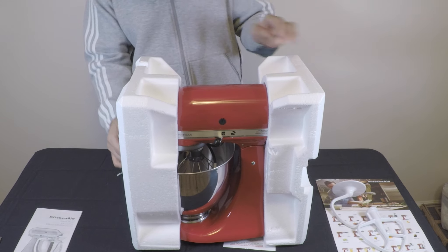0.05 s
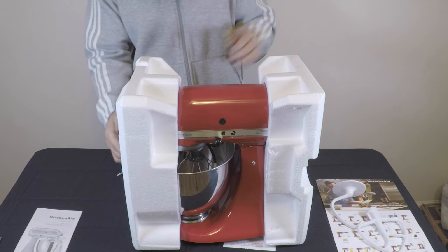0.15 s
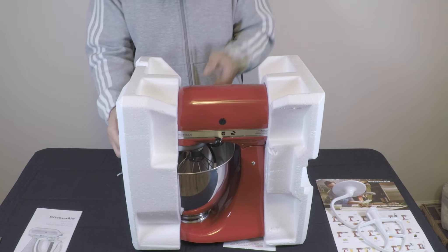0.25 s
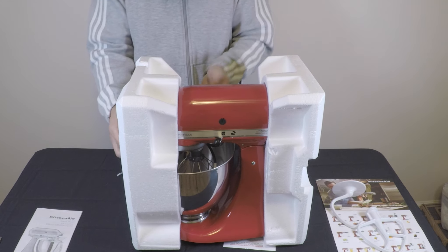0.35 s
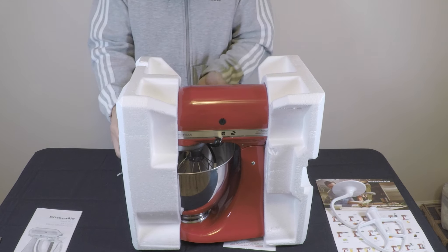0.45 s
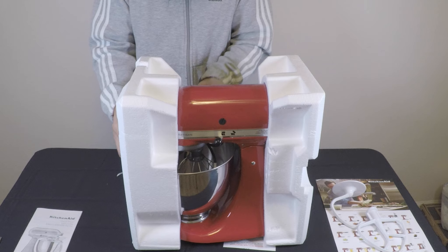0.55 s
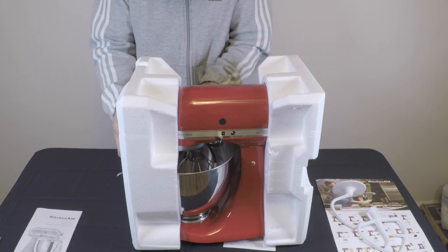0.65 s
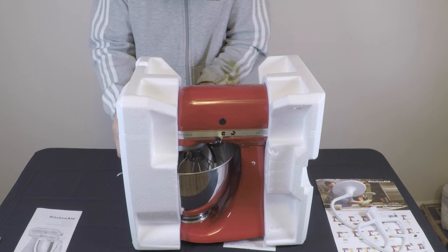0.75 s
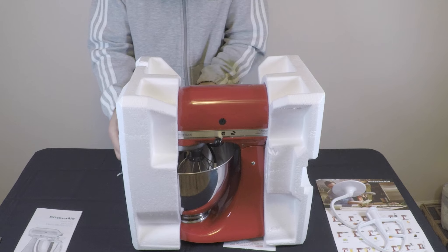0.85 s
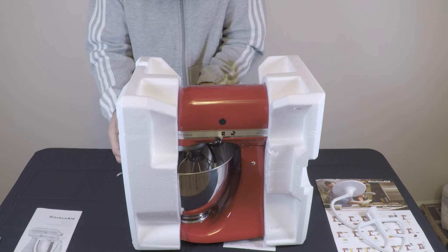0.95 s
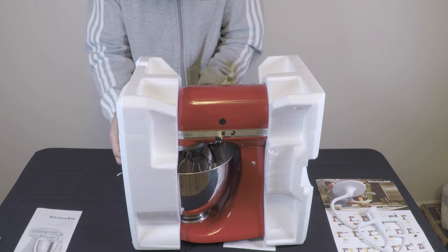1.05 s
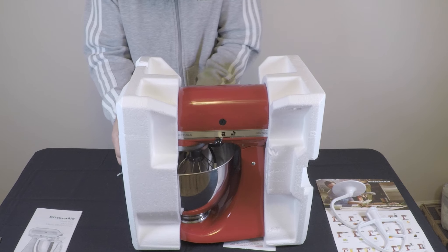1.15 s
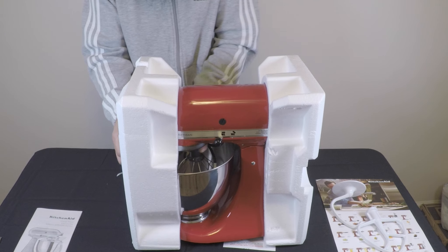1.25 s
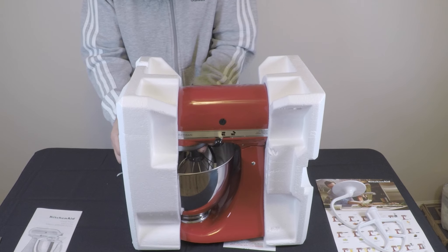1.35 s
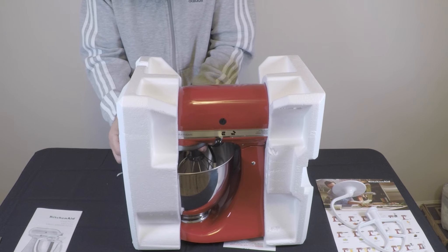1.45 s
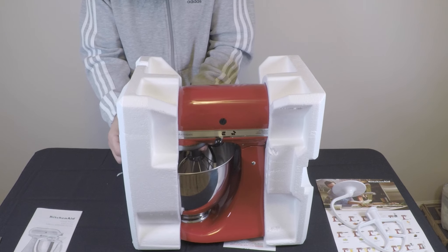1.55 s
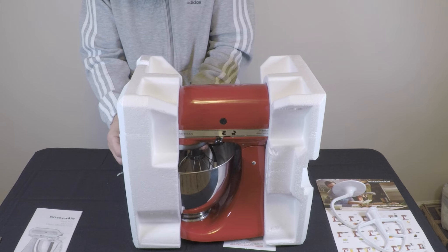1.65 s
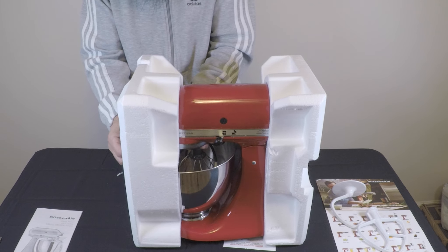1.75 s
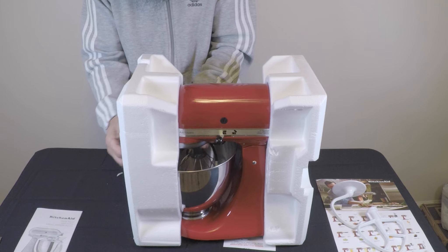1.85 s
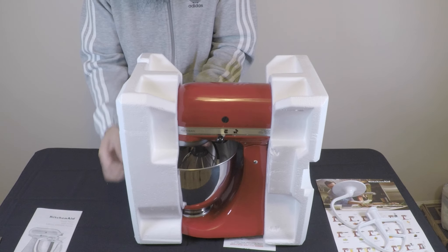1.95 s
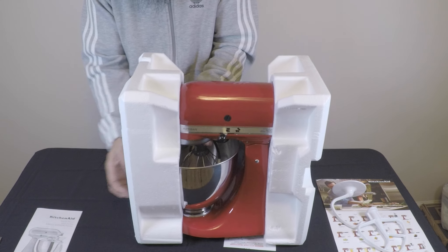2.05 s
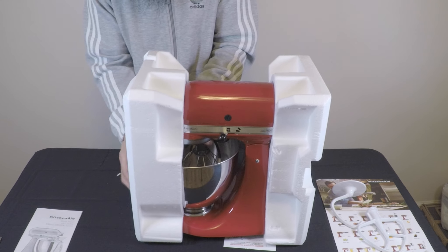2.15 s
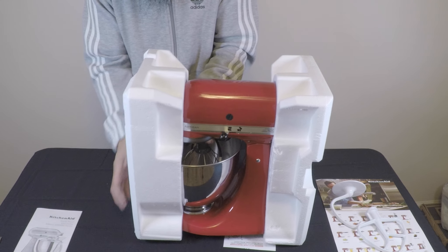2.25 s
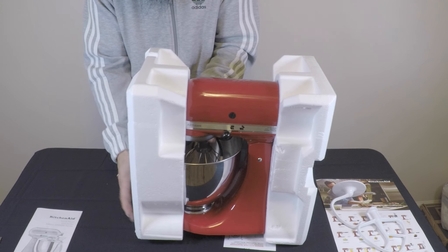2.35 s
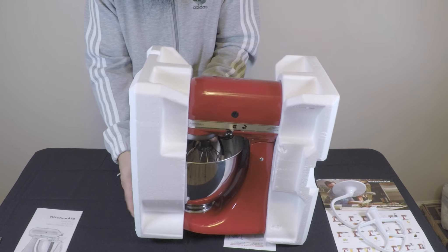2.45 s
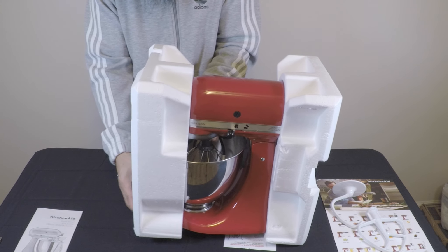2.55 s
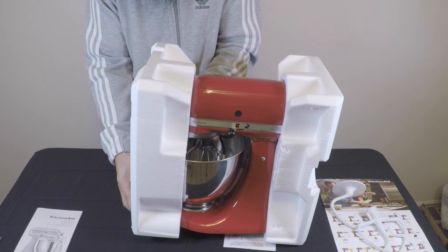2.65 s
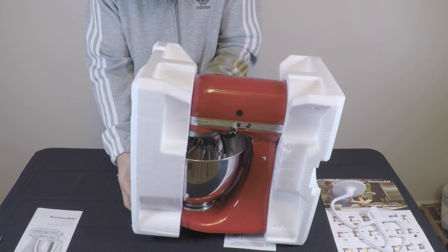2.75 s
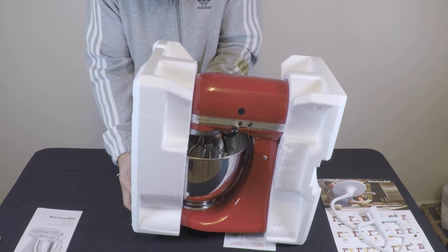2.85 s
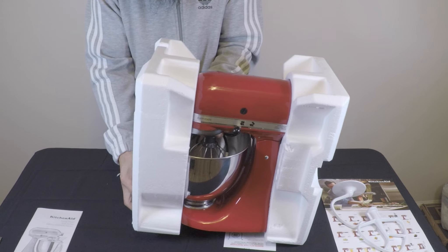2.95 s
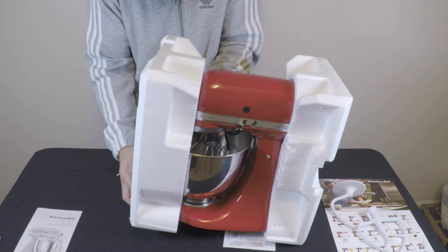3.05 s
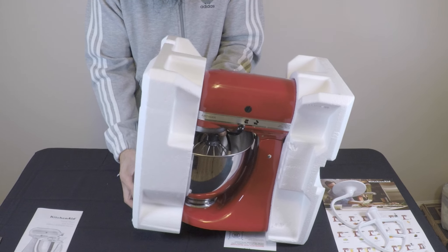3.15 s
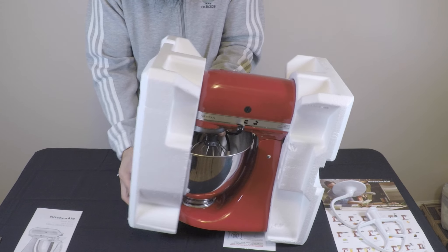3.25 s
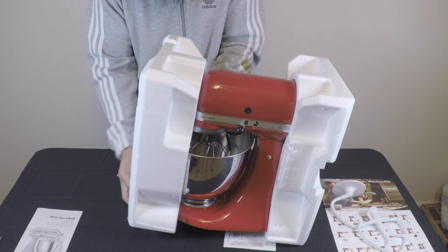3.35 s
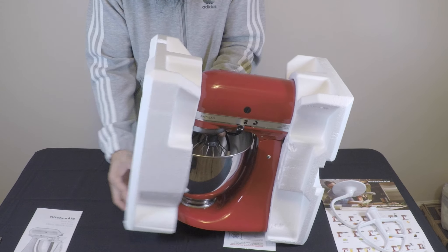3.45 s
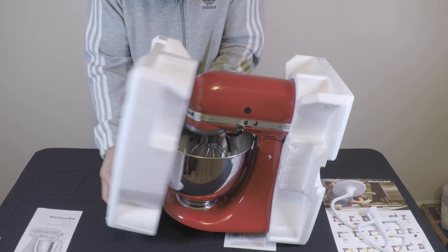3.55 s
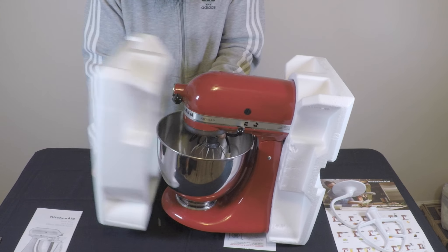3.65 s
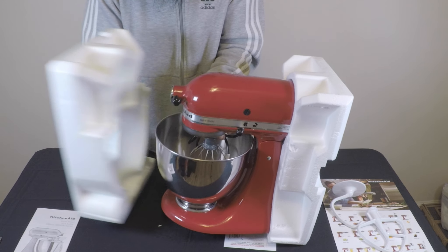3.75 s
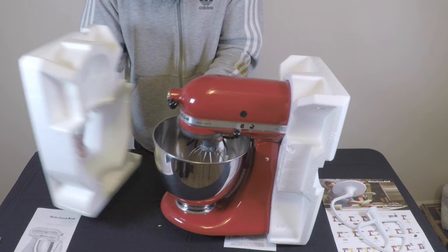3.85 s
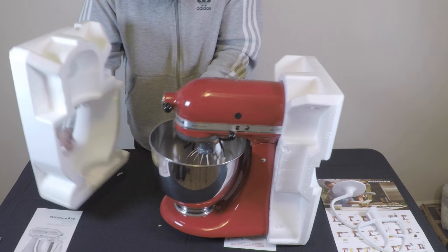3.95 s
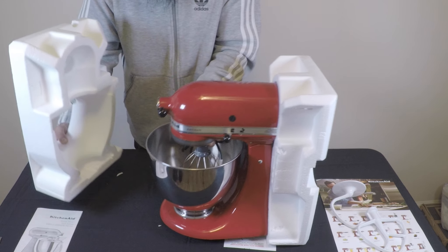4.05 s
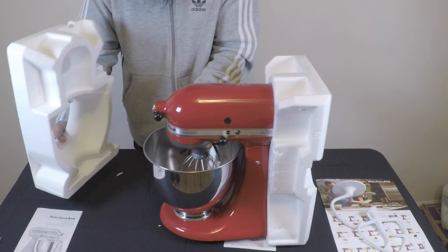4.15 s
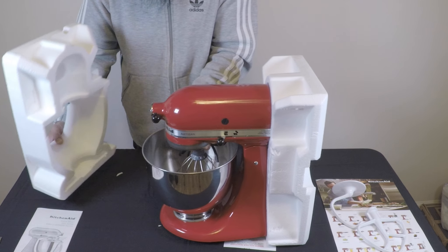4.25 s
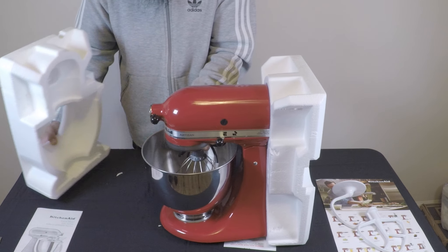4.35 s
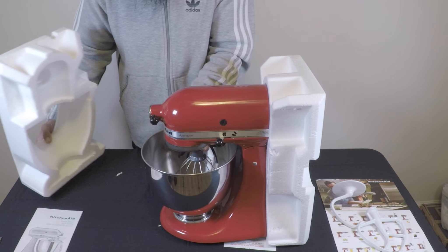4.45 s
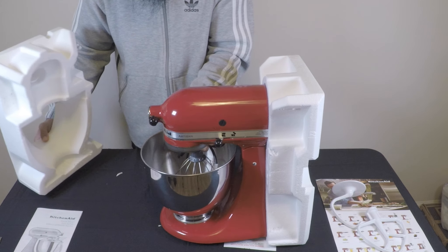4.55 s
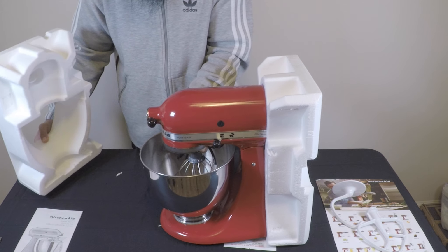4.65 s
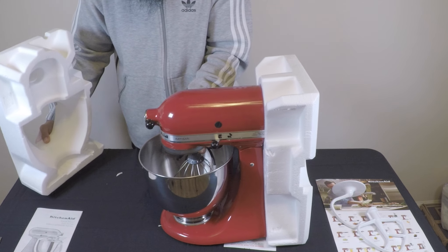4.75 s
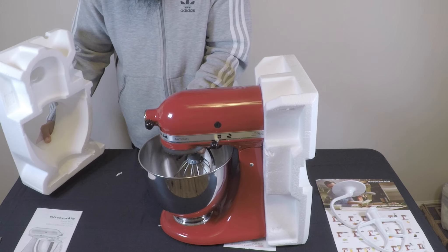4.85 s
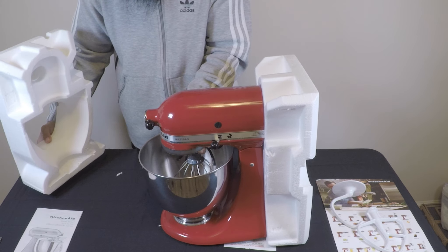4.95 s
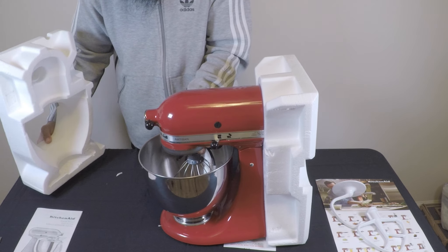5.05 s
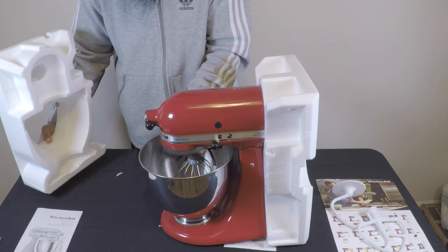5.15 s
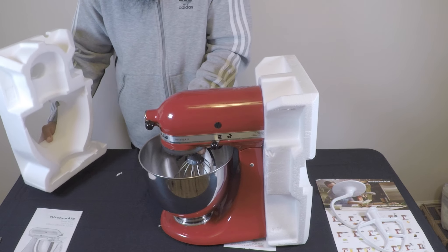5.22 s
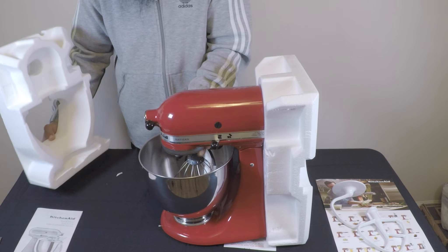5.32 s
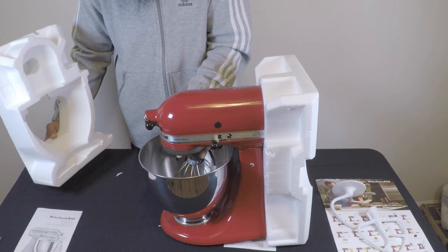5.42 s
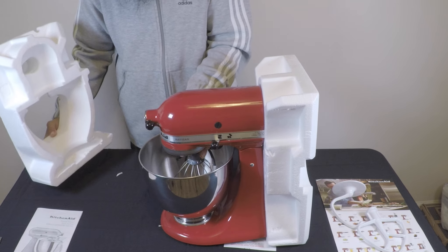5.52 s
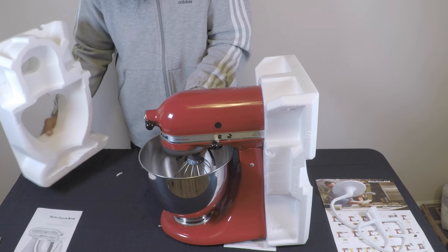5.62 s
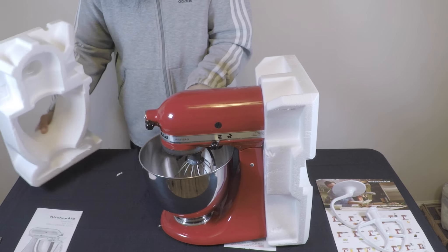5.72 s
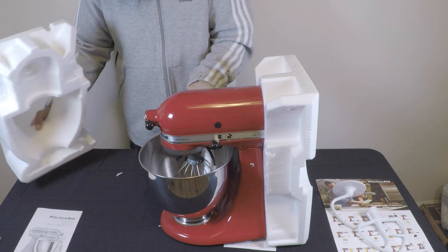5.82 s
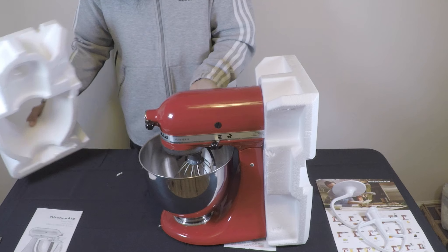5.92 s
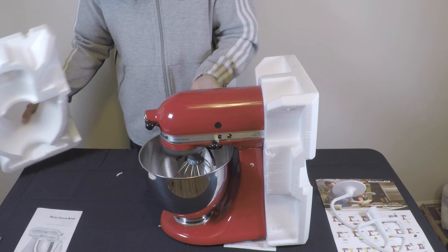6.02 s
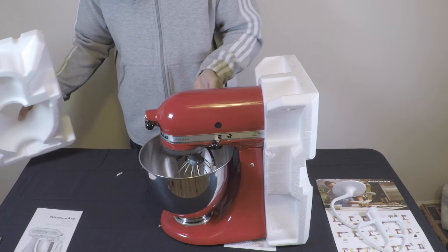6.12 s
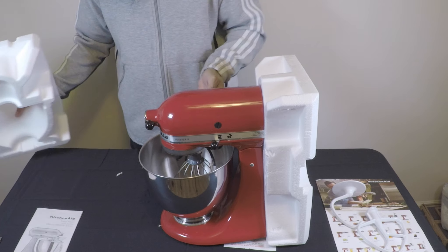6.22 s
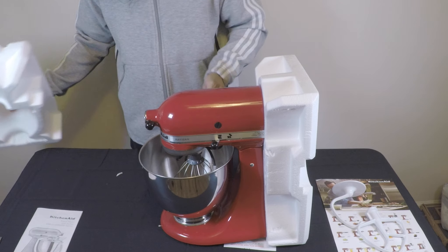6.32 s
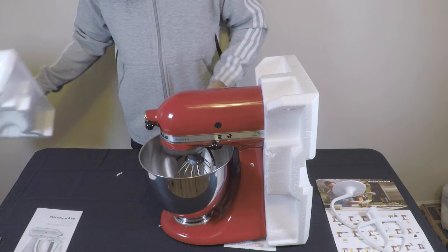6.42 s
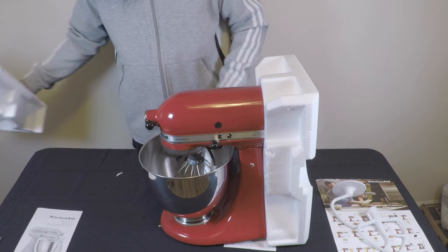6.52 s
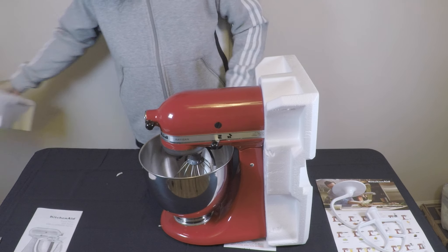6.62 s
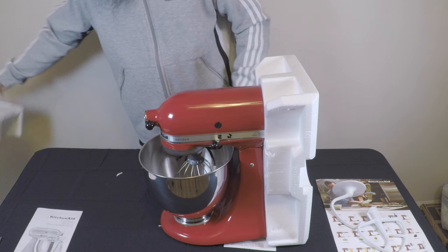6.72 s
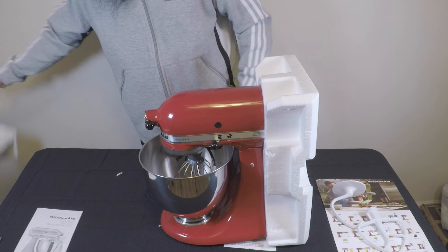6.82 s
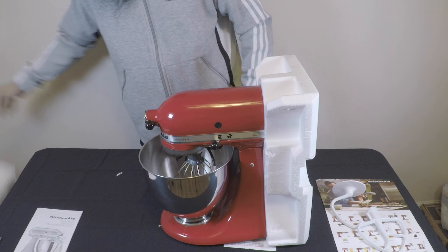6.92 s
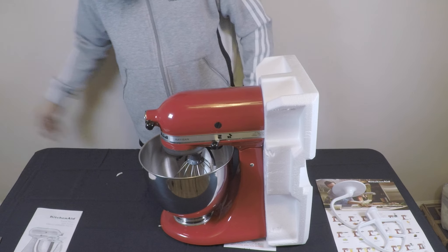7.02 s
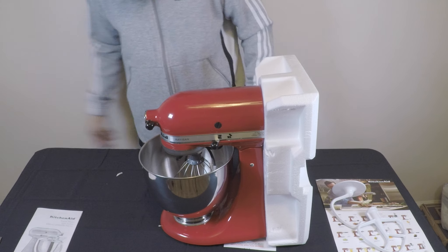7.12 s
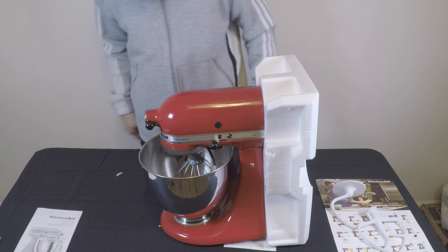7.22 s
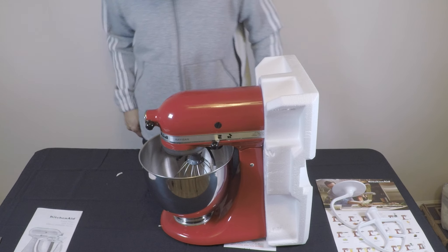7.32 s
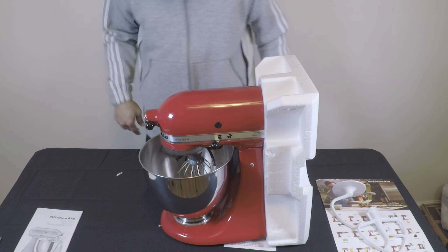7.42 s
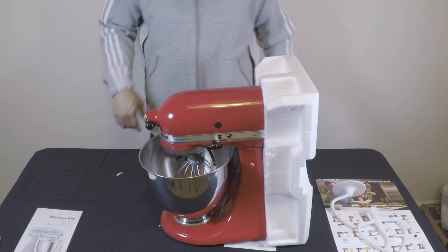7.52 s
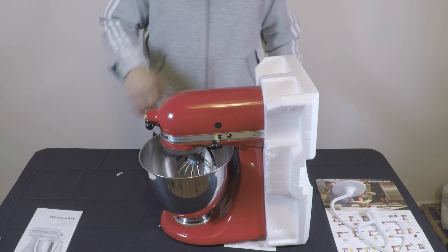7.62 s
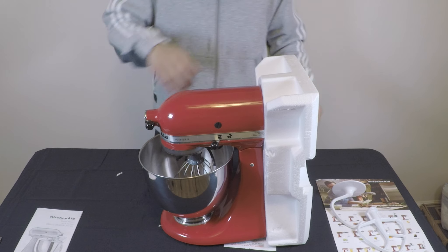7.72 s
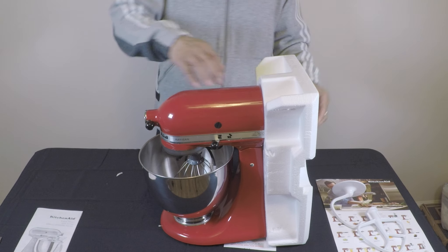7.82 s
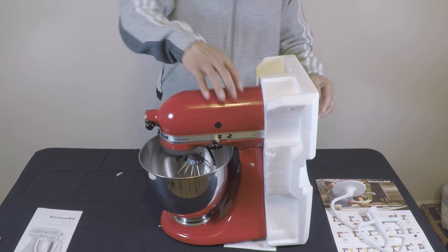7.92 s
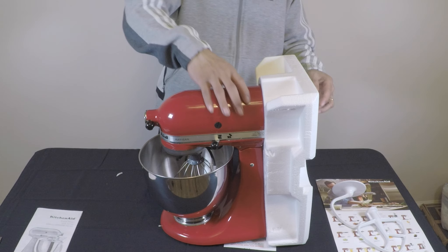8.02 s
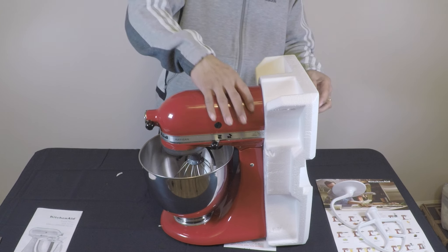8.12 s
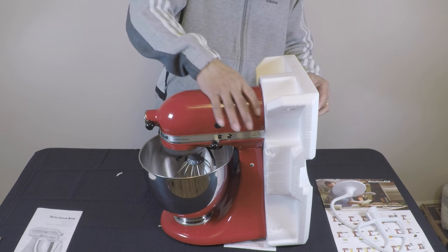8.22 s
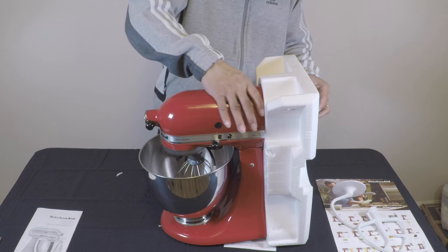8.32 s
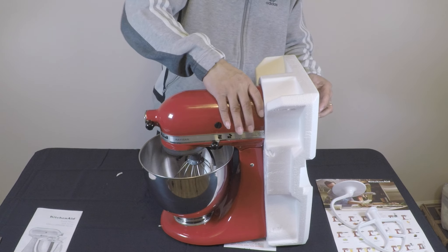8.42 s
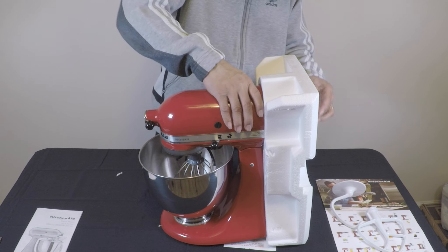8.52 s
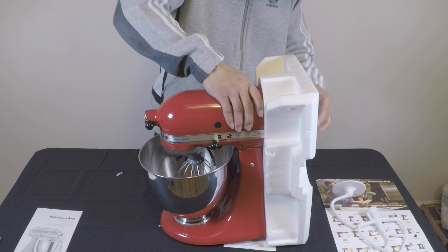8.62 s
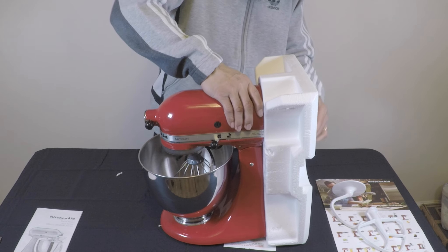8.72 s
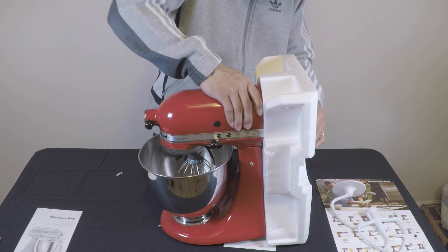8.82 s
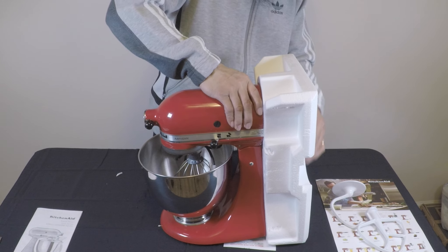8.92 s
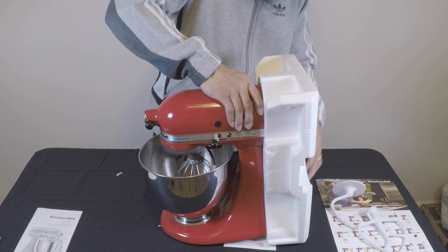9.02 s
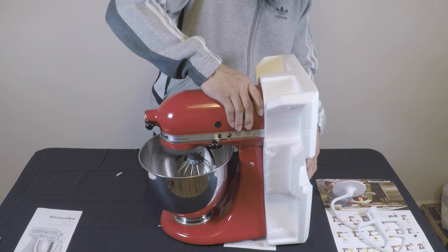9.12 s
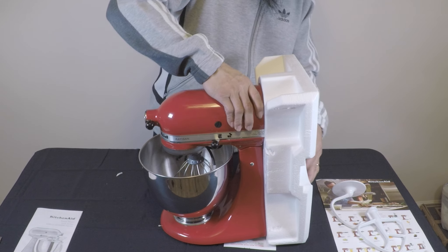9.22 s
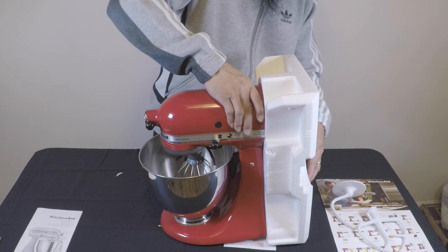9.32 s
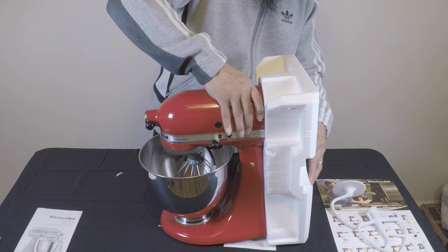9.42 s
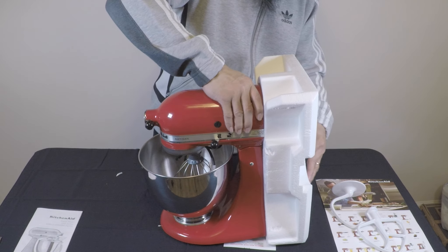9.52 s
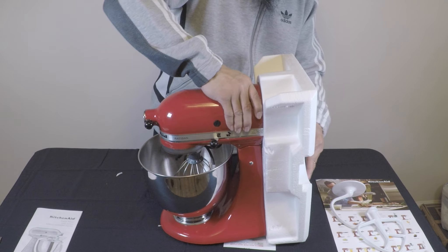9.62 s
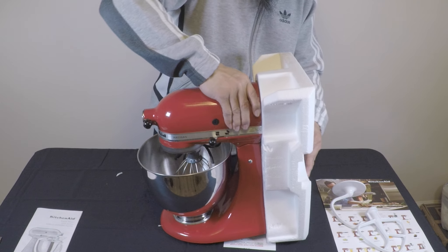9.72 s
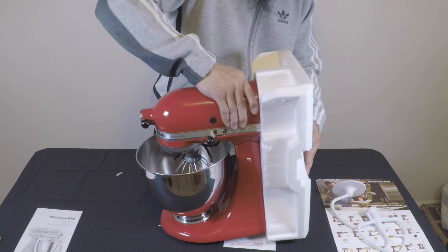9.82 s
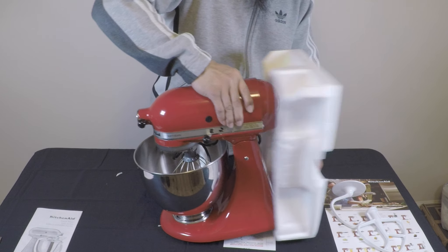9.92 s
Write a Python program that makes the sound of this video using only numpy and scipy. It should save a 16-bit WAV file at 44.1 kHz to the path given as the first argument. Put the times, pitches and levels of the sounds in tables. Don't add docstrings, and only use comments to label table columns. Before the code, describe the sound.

In a small bare reverberant room, hands tug a rigid foam block off a stand mixer on a table: crisp dry scraping, bead ticks, dull knocks, a short squeak and a low table boom. After quieter handling, the block falls and bounces hollowly on the floor, by far the loudest moment. Then fingers softly rub a second block, over faint room hiss and hum.

```python
import sys
import numpy as np
from scipy import signal
from scipy.fft import rfft, irfft, next_fast_len
from scipy.io import wavfile
from scipy.ndimage import uniform_filter1d

SR = 44100
rng = np.random.default_rng(int(sys.argv[2]) if len(sys.argv) > 2 else 0)


def unload_wav(signal):
    wavfile.write(
        sys.argv[1],
        SR,
        np.round(np.clip(np.atleast_2d(signal).T, -1, 1) * 32767).astype(np.int16),
    )


def voltage_ratio(level):
    return 10 ** (np.asarray(level, float) / 20)


N = 439677

# [start t/s, hold/s, hiss level/dB, weight/dB, cell f/Hz]
PULLS = [(0, 0.0082, -62, -17, 6500), (0.283, 0.044, -74, 13, 6700), (0.55, 0.025, -65, -14, 4730),
         (0.763, 0.1, -48.5, -21, 8100), (0.965, 0.07, -47.5, -30, 3970), (1.097, 0.12, -47.5, -17, 6650),
         (1.184, 0.14, -50, -11, 6700), (1.22, 0.15, -57, -15, 1550), (1.635, 0.1, -59, 1, 6000),
         (1.655, 0.045, -53, -16, 1450), (1.79, 0.037, -70, -2, 4300), (1.924, 0.013, -43, -18, 6700),
         (2.157, 0.025, -49.5, 15, 4800), (2.216, 0.043, -45.5, -2, 5070), (2.48, 0.02, -53, 12, 3630),
         (2.937, 0.039, -56, -7, 4440), (3.052, 0.024, -54, 12, 5830), (3.187, 0.069, -57.5, 9, 3640),
         (3.333, 0.03, -51, 3, 2100), (3.384, .012, -50.5, 0, 2600), (3.46, 0.13, -53.5, 4.5, 4150),
         (3.545, 0.014, -39, -16, 5200), (3.72, 0.073, -66, 11.5, 4100)]
SHIFTS = [(4.2, 0.22, -70.5, 8, 4300), (4.72, 0.05, -67, -9, 3640), (5, 0.03, -60, -8, 5070),
          (5.48, 0.047, -67, 0, 4200), (5.93, 0.05, -61.5, -14.5, 2610), (6.67, 0.055, -55.5, -6, 3980),
          (6.72, 0.066, -73.5, 15, 3980), (8.37, 0.0543, -61, 5.5, 3716), (8.66, 0.052, -73, 18, 3870),
          (8.77, 0.12, -73.5, 21, 4250), (8.9, 0.071, -64, 4, 4200), (8.958, 0.061, -56.5, 4.5, 3900),
          (9.07, 0.093, -52.5, -8.5, 5200), (9.267, .1, -55.5, 1.5, 4240),
          (9.45, 0.0234, -58, -18.5, 10000), (9.68, 0.17, -67, 10, 4380), (9.821, 0.041, -57, 13.5, 4630),
          (9.92, 0.046, -60.5, 12, 6430)]
# [t/s, level/dB]
CREEP = [(0, -70), (.26, -91), (.5, -74.5), (1.1, -66), (1.5, -64), (1.9, -60), (2.45, -69.5), (2.6, -61),
         (2.9, -68.5), (3.3, -62), (3.7, -64.5), (3.84, -74.5), (4.68, -83.5), (4.78, -75), (6.1, -79),
         (6.5, -83), (8.3, -85), (9.97, -66.5)]
# [f/Hz, level/dB per Hz]
HISS = [(1180, -40.5), (2000, -8.5), (3010, -4.5), (4230, -7.5), (5680, -6.5), (7640, -5), (11900, -7.5),
        (15500, -13), (16000, -36.5)]
# [f/Hz, level/dB]
SCRAPE = [(600, -6.5), (1000, 2), (1500, -1.5), (2500, -5.5), (4000, -23)]
# [f/Hz, width/Hz, level/dB]
POCKETS = [(2660, 230, -7.5), (4200, 900, 0), (5345, 270, -7.5), (7230, 290, -8), (10930, 300, -13),
           (11600, 300, -13)]
# [f/Hz, width/Hz, level/dB]
HELD_BLOCK = [(166.7, 120, -8.5), (280.5, 28, 1.5), (337, 36, 0), (410, 57, 4), (450, 120, 0),
              (570, 126, -1), (800, 170, -7)]
# [t/s, peak level/dB, body re peak/dB, top re peak/dB, crack f/Hz]
SNAPS = [(0.2806, -58.5, 12, 3.5, 6760), (0.3053, -64, 22.5, 14.5, 7200), (0.7667, -54.5, -38, 6.5, 6250),
         (8.3193, -53, 0.5, -11, 1040), (1.1815, -43.5, -17, -8, 4400), (1.058, -59, -20, 9.5, 6500),
         (3.239, -52, -11, 2.5, 2000), (3.587, -54.5, -20, 14, 9000), (1.4657, -47, 5, 2, 1200),
         (2.5646, -50, -15, 5, 1210), (2.93, -49.5, 3.5, -0.5, 4270), (3.0449, -35, -7, -6.5, 1420),
         (3.1824, -42.5, -5, -2.5, 2770), (3.3257, -41, -15, 5, 1080), (3.4257, -29.5, -16, -3.5, 3500),
         (5.8569, -43, -21, -11.5, 1300), (3.9196, -40.5, 5.5, -6, 1250), (4.997, -41.5, -8, -0.5, 1110),
         (5.259, -52, 0.5, -3.5, 1080), (6.063, -49, -9, -8, 1920), (6.6562, -54, -17, -6, 1200),
         (6.088, -42, -16, -3.5, 3320), (6.6902, -41, -6.5, -0.5, 2500), (9.0575, -40, -4, -2, 3450),
         (9.4412, -47.5, -4, -3, 4480), (9.7419, -48.5, 3, 1.5, 3050)]
# [t/s, peak level/dB, body re peak/dB, top re peak/dB, body f/Hz]
TAPS = [(0.5927, -44.5, 3, -12, 362), (1.502, -43, 0, -2.5, 870), (1.551, -41, -17, -8, 860),
        (2.1277, -40.5, 7.5, -12.5, 460), (2.1505, -36.5, 3.5, -17.5, 268), (2.1763, -37, 14, -2.5, 269),
        (2.4745, -33, 2.5, -11.5, 770), (2.6669, -44.5, 5, -7, 410), (2.752, -41, -0.5, -39, 151),
        (3.4645, -41.5, 9, -12, 500), (4.202, -51, 2, -17, 770), (4.715, -45, -11, -14, 250),
        (4.805, -50, 9.5, -13.5, 182), (4.9139, -48.5, 5.5, -10, 150), (5.1502, -53.5, 0, -8, 774),
        (5.6779, -44, -5, -44, 780), (1.184, -55, 17.5, -28, 300), (0.875, -55, 14.5, 0, 285),
        (8.3648, -46.5, 11, -22, 221), (8.649, -51.5, 5.5, -33.5, 368), (8.78, -63.5, 25, -23, 293),
        (8.8588, -51.5, 10, -32.5, 473), (9.2795, -45.5, 5, -30, 348), (9.832, -46, 2, -20, 510)]
# [f/Hz, level/dB]
SLAP = [(600, -1.5), (1000, 13), (1400, 4.5), (2100, -1), (3500, -8), (5500, -15), (9000, -43.5),
        (15000, -63)]
# [f/Hz, level/dB]
TOP = [(3500, -10.5), (6000, -12.5), (8000, -7), (12000, -11.5), (14500, -13), (16400, -14.5)]
# [t/s, level/dB,
# f/Hz, t60/s]
PANELS = [(7.116, -21, 790, 0.046), (7.117, -15.5, 235, 0.07), (7.128, -19, 316.6, 0.33),
          (7.13, -19.5, 145, 0.2), (7.146, -17.5, 512, 0.092), (7.148, -20.5, 855, 0.062),
          (7.1749, 2.5, 845, 0.01), (7.175, -16.5, 500.8, 0.37), (7.177, -14, 728, 0.096),
          (7.178, -19.5, 899, 0.25), (7.176, -21, 321, 0.27), (7.176, -19.5, 241, .15),
          (7.176, -23, 1113, .12), (7.175, -25.5, 1280, 0.076), (7.176, -25, 2040, 0.14),
          (7.196, -11.5, 498.6, 0.18), (7.21, -22.5, 647, .15), (7.25, -15.5, 564, .06),
          (7.286, -23.5, 420, 0.22), (7.303, -17.5, 493, .12), (7.351, -19.5, 397, .08),
          (7.352, -18, 468, 0.074), (7.38, -23, 690, 0.088), (7.388, -20, 388, 0.11),
          (7.392, -22.5, 535, .1), (7.409, -20.5, 417, 0.17), (7.477, -15.5, 719, 0.071),
          (7.477, -14, 514, 0.045), (7.5, -26, 903, 0.11), (7.52, -25, 528, 0.2),
          (7.54, -29, 226, 0.23), (7.612, -18, 506, 0.12), (7.612, -18, 793, 0.088),
          (7.628, -18, 706, 0.14), (7.64, -13.5, 410, 0.14), (7.689, -18, 632, 0.11),
          (7.69, -22.5, 464, 0.17), (7.715, -24.5, 730, 0.14), (7.74, -22.5, 622, 0.12),
          (7.74, -28, 420, 0.11), (7.75, -26.5, 700, 0.12), (7.78, -28.5, 469, 0.096),
          (7.3525, -3, 427, 0.027), (7.478, -25, 1704, 0.011), (7.613, -25, 1406, 0.054),
          (7.615, -35, 1920, 0.074), (7.645, -4, 610, 0.011), (7.69, -24.5, 1276, 0.042),
          (7.72, -25, 1090, 0.047),
          (0.305, -56.5, 327, 0.22), (.593, -49, 1230, .04), (.6, -53, 414, 0.088),
                  (.77, -51.5, 570, 0.055), (0.874, -49, 1176, 0.045), (.985, -57, 1154, 0.091),
                  (1.185, -51, 1100, .03), (2.128, -42, 462, .04), (2.177, -32, 785, .05),
                  (2.19, -34, 420, 0.14), (2.215, -38, 1330, .05), (2.285, -40.5, 325, 0.15),
                  (2.476, -35, 436, 0.095), (2.476, -38, 800, .035), (3.045, -49, 410, .1),
                  (3.389, -41.5, 1164, 0.13), (3.466, -35.5, 508, 0.066), (3.921, -43.5, 470, 0.084),
                  (3.921, -48, 1317, 0.045), (5.678, -54, 787, .12), (5.677, -55, 1170, 0.054),
                  (6.69, -53, 420, 0.13), (8.367, -51, 641, 0.078), (8.367, -60, 440, 0.077),
                  (9.3, -52, 393, 0.11), (9.361, -52, 380, 0.2), (9.43, -54.5, 385, 0.21),
                  (9.48, -57, 798, .08), (9.715, -52.5, 561, 0.17), (9.759, -48, 1140, .05),
                  (9.828, -43, 1027, 0.07), (9.842, -48, 514, .08), (9.848, -53, 383, .08),
                  (9.931, -44.5, 1024, 0.041), (9.94, -51, 370, .08), (.766, -39, 6820, 0.027),
                  (.28, -49, 6810, 0.022), (1.549, -46, 4450, .03), (2.008, -56, 4380, .02),
                  (2.325, -41.5, 1077, 0.21), (2.425, -53, 1072, .1), (3.325, -41, 2525, 0.052),
                  (4.715, -62, 1180, 0.055), (4.859, -53, 490, .08), (4.915, -62, 1153, .15),
                  (5.93, -58, 1894, 0.086), (5.678, -47, 1570, 0.022), (9.201, -53, 1240, 0.083),
          (7.177, -25.5, 1525, 0.22), (7.177, -30, 1680, .15), (7.178, -29, 1826, .15),
        (7.19, -28.5, 2040, .2), (7.19, -28, 1362, 0.13), (7.21, -29.5, 1133, 0.16), (7.2, -32, 2200, .12),
        (7.13, -34.5, 1160, .1), (7.13, -38.5, 1200, 0.09), (7.613, -31, 1800, 0.1),
        (7.613, -31, 1650, 0.1), (7.645, -31, 1250, 0.1), (7.48, -41, 2100, 0.088),
        (3.426, -31.5, 3800, 0.023), (3.547, -44, 4900, 0.093), (2.151, -40.5, 2500, .03),
        (2.3, -40, 920, .03), (1.3, -55.5, 1700, 0.36), (1.9, -58.5, 1500, 0.154), (1.505, -56, 870, .15)]
# [t/s, length/s, f/Hz, level/dB, unsteadiness/rad per sample]
SQUEAKS = [
    (1.503, 0.18, 843, -49, .008),
    (2.223, 0.14, 1105, -28.5, 0.0086),
    (3.325, 0.13, 1114, -40.5, .05),
    (4.379, 0.13, 785, -60, .02),
    (4.738, 0.14, 760, -60, .02),
    (5.491, 0.089, 782, -53, 0.022),
    (9.253, 0.22, 1303, -46.5, 0.046),
]
# [t/s, peak level/dB, thud, slap and top re peak/dB]
TUMBLE = [(7.1155, -7.5, -1, -14, -16), (7.1208, -30, -21.5, -20, 0), (7.174, -0.5, -29.5, -5.5, -40),
          (7.199, -12, -19, -27.5, -48.5), (7.284, -11.5, -43.5, -10.5, -52), (7.352, -9.5, -7, -16.5, -23),
          (7.392, -16, -18.5, -25, -19.5), (7.449, -12.5, -17.5, -20, -21.5), (7.477, -8, -8.5, -15.5, -44),
          (7.519, -14.5, -16, -37, -45.5), (7.589, -15, -15, -25.5, -26), (7.611, -8.5, -25, -11, -33.5),
          (7.644, -10, -15, -19, -53), (7.69, -12, -46, -30, -49.5), (7.719, -20, -33.5, -14, -43),
          (7.749, -22, -9.5, -39, -57.5)]
# [f/Hz, width/Hz, level/dB]
FREE_BLOCK = [(234, 19, -3), (326, 65, -7), (410, 28, -2), (508, 43, -3), (622, 91, -7.5), (706, 59, -4),
              (940, 140, -9), (1113, 182, -10.5)]
# [f/Hz, width/Hz, level/dB]
THUD = [(102, 150, 0.5), (212, 133, 6)]
# [t/s, level/dB, push length/s]
PUSHES = [(0.331, -71, 0.014), (0.61, -55, .02), (0.885, -55, 0.017), (1.499, -40.5, 0.0083),
          (1.42, -46, 0.036), (1.579, -44, 0.012), (2.043, -49.5, 0.0037), (2.18, -63, 0.013),
          (2.397, -29.5, 0.022), (4.844, -26, 0.0086), (7.107, -37, .015), (8.373, -53.5, .005)]
# [f/Hz, level/dB, t60/s]
TABLE_MODES = [(65.37, -2, 0.94), (91.5, -12.5, 0.16), (48.3, -8, 0.26)]
# [t/s, hum level/dB]
LEAN = [(0, -57), (.8, -58.5), (1.7, -69), (2.35, -51), (2.6, -50), (2.92, -72), (3.16, -54.5), (3.5, -58),
        (3.85, -68.5), (4.8, -62), (5.02, -57.5), (6.4, -69), (6.95, -83), (7.27, -51), (7.7, -55),
        (8.1, -73.5), (9.11, -60.5), (9.97, -72)]
# [f/Hz, level/dB per Hz]
RUMBLE = [(30, -37.5), (48, -9.5), (65, 9), (90, -5), (125, -5), (170, -35), (260, -55.5)]
# [t/s, spread/s, level/dB]
SHOVES = [
    (.77, 0.34, -54),
    (1.8, 0.27, -64),
    (2.6, 0.54, -52),
    (3.55, 0.36, -51),
    (5, 0.13, -48.5),
    (5.4, 0.31, -56),
    (7.171, .1, -64.5),
    (8.85, 0.21, -57.5),
    (9.7, 0.34, -53),
]
# [f/Hz, level/dB per Hz]
SWAY = [(10, -19.5), (18, -3.5), (28, -7), (38, -8), (48, -22.5), (60, -63.5)]
# [f/Hz, level/dB per Hz]
QUIET = [(12, -32.5), (20, -1), (70, -15), (130, -14.5), (177, -10), (357, -13), (660, -15.5), (738, -19),
         (976, -17), (1860, -20.5), (12800, -27.5), (14700, -29.5), (16000, -52.5)]
# [f/Hz, t60/s]
WALLS = [(100, 0.6), (250, 0.43), (400, 0.59), (600, 0.68), (1000, 0.69), (2000, 0.66), (5000, 0.61),
         (12000, 0.43)]


def rubbing():
    grain_db = 3 * rng.standard_normal((3, N // 24 + 1))
    grains = rng.standard_normal((3, N)) * voltage_ratio(grain_db.repeat(24, axis=1)[:, :N])
    grains[2] = filtered(grains[2], hollow(HELD_BLOCK))
    hz, t, z = signal.stft([unit(g) for g in grains], SR, nperseg=512)

    contacts = [(voltage_ratio(db) * stroke(t, s, hold), weight, cell)
                for s, hold, db, weight, cell in PULLS + SHIFTS]
    contacts += [(voltage_ratio(curves(CREEP, t)[0]), 4.5, 4300)]
    hiss_power, scrape_power, body_power = 0, 0, 0
    for gain, weight, cell in contacts:
        scrape_db = min(4.5 + 0.86 * weight, 6.5)
        hiss_power = hiss_power + np.outer(cells(hz, cell) ** 2, gain ** 2)
        scrape_power = scrape_power + (gain * voltage_ratio(scrape_db)) ** 2
        body_power = body_power + (gain * voltage_ratio(weight)) ** 2

    hiss_colour = unit(shade(HISS)(hz) * (1 + 1.35 * np.abs(hollow(POCKETS)(hz))))[:, None]
    scrape_colour = unit(shade(SCRAPE)(hz))[:, None]
    mix = hiss_colour * np.sqrt(hiss_power) * z[0]
    mix = mix + np.sqrt(scrape_power) * scrape_colour * z[1]
    mix = mix + voltage_ratio(-1.0) * np.sqrt(body_power) * z[2]

    patches = uniform_filter1d(rng.standard_normal(z.shape[1:]), size=4, axis=0)
    patches = uniform_filter1d(patches, size=5, axis=1)
    uneven_db = 2.2 * unit(patches)
    direct = signal.istft(mix * voltage_ratio(uneven_db - 5.0), SR, nperseg=512)[1][:N]
    return room(direct, wet_db=-6)[:N]


def stroke(t, s, hold):
    grab_s, let_go_db_per_s = 0.035, 185
    bite = np.clip((t - s) / grab_s + 0.5, 0, 1)
    return bite * voltage_ratio(-let_go_db_per_s * np.maximum(t - s - hold, 0))


def cells(hz, cell_hz):
    streaks = unit(uniform_filter1d(rng.standard_normal(len(hz)), size=2))
    region = np.exp(-(np.log((hz + 1) / cell_hz) / 0.45) ** 2)
    lift = voltage_ratio(7.15 * region + 1.7 * streaks)
    return lift / np.sqrt(np.mean(lift[hz > 2500] ** 2))


def ticks():
    out = np.zeros(N)
    snap_body_hz, tap_crack_hz = 420, 1150
    slips = [(*row, snap_body_hz) for row in SNAPS]
    slips += [(*row[:-1], tap_crack_hz, row[-1]) for row in TAPS]
    for s, db, body_db, top_db, hz, body_hz in slips:
        pitched = lambda f: shade(SLAP)(f) ** 0.29 * favour(f, hz, sharp=4, base=0.6)
        region = lambda f: hollow(HELD_BLOCK)(f) * favour(f, body_hz, sharp=8, base=0.3)
        crack = burst(pitched, t60=0.041, rise=0.000067)
        knock = burst(region, t60=0.017, rise=0.0009)[1]
        top = burst(shade(TOP), t60=0.0073, rise=0.0001)
        hit = with_click(crack, 0.35) + voltage_ratio(body_db) * knock + voltage_ratio(top_db) * with_click(top, 0.62)
        add(out, s, voltage_ratio(db - 7.5) * room(hit[0], wet_db=0.5, spread=hit[1]))
    return out


def panels():
    direct, t = np.zeros(N), np.arange(SR // 4) / SR
    for s, db, hz, t60 in PANELS:
        waver = 0.032 * hz / 1000 * np.cumsum(rng.standard_normal(len(t)))
        swell = 1 - np.exp(-t * hz / 0.38)
        add(direct, s, voltage_ratio(db - 60 * t / t60) * swell * np.sin(2 * np.pi * hz * t + waver))
    return voltage_ratio(1.5) * room(direct, wet_db=-6)[:N]


def squeaks():
    out = np.zeros(N)
    for s, length, hz, db, unsteady in SQUEAKS:
        u = np.arange(round(length * SR)) / (length * SR)
        drift = np.cumsum(rng.standard_normal(len(u))) * unsteady
        phase = 2 * np.pi * hz * (u - 0.012 * u ** 2) * length + drift
        tone = np.sin(phase) + 0.03 * np.sin(2 * phase)
        envelope = np.minimum(u / 0.12, 1) * (1 - u) * voltage_ratio(-17 * u)
        add(out, s, voltage_ratio(db) * room(tone * envelope, wet_db=-8))
    return out


def tumble():
    out = np.zeros(N)
    push_top_hz = 3500
    landing_top_hz = 12500
    for s, db, thud_db, slap_db, top_db in TUMBLE:
        hz = 440 + 200 * (s - TUMBLE[0][0])
        region = lambda f: hollow(FREE_BLOCK)(f) * favour(f, hz, sharp=1.1, base=0.73)
        softened = lambda f: region(f) / (1 + 1j * f / push_top_hz) ** 2
        dulled = lambda f: shade(TOP)(f) / (1 + (f / landing_top_hz) ** 6)
        hit = burst(softened, t60=0.006, rise=0.00028)[[1, 1]]
        hit = hit + voltage_ratio(thud_db) * burst(hollow(THUD), t60=0.063, rise=0.004)
        hit = hit + voltage_ratio(slap_db) * with_click(burst(shade(SLAP), t60=0.02, rise=0.0002), 1)
        hit = hit + voltage_ratio(top_db) * burst(dulled, t60=0.045, rise=0.0012)
        add(out, s, voltage_ratio(db - 12.0) * room(hit[0], wet_db=8.5, spread=hit[1]))
    return out


def table():
    out, t, now = np.zeros(N), np.arange(SR) / SR, np.arange(N) / SR
    for s, db, push in PUSHES:
        ring = sum(voltage_ratio(level - 60 * t / t60) * np.sin(2 * np.pi * hz * t)
                   for hz, level, t60 in TABLE_MODES)
        add(out, s, voltage_ratio(db) * ring * (1 - np.exp(-t / push)))
    lean_gain = voltage_ratio(curves(LEAN, now)[0])
    sway_gain = voltage_ratio(-66)
    for s, spread, db in SHOVES:
        sway_gain = sway_gain + voltage_ratio(db) * np.exp(-((now - s) / spread) ** 2)
    hum = unit(filtered(rng.standard_normal(N), shade(RUMBLE)))
    sway = unit(filtered(rng.standard_normal(N), shade(SWAY)))
    return out + lean_gain * hum + sway_gain * sway


def quiet():
    air = unit(filtered(rng.standard_normal(N), shade(QUIET)))
    hum = unit(filtered(rng.standard_normal(N), lambda f: 1 / (1 + ((f - 120) / 6) ** 2)))
    return voltage_ratio(-71) * air + voltage_ratio(-77.5) * hum


def room(direct, wet_db, spread=None):
    hz, t, z = signal.stft(rng.standard_normal(SR * 2 // 3), SR, nperseg=512)
    decay = voltage_ratio(-60 * t / along(WALLS, hz)[:, None]) + voltage_ratio(-3.0 - 60 * t / 0.22)
    tail = signal.istft(z * decay, SR, nperseg=512)[1]
    tail = np.pad(tail / np.linalg.norm(tail), (90, 0))
    wet = signal.fftconvolve(direct if spread is None else spread, tail)
    return np.pad(direct, (0, len(tail) - 1)) + voltage_ratio(wet_db) * wet


def burst(response, t60, rise):
    t = np.arange(SR // 12) / SR
    puff = rng.standard_normal(len(t)) * voltage_ratio(-60 * t / max(t60, 0.0005)) * (1 - np.exp(-t / rise))
    pair = np.pad([puff, t == 0], ((0, 0), (64, 0)))
    pair = filtered(pair, response, pad=1024)[:, 32:]
    return pair / np.linalg.norm(pair, axis=1, keepdims=True) * np.sqrt(SR / 250)


def with_click(pair, share):
    return pair + share * pair[1] * [[1], [0]]


def hollow(modes):
    return lambda f: sum((-1) ** k * voltage_ratio(db) * 1j * f * width / (hz * hz - f * f + 1j * f * width)
                         for k, (hz, width, db) in enumerate(modes))


def favour(f, hz, sharp, base):
    damping = 1j * f * hz / sharp
    return base + damping / (hz * hz - f * f + damping)


def filtered(x, response, pad=8192):
    n = np.shape(x)[-1]
    m = next_fast_len(n + pad)
    return irfft(rfft(x, m) * response(np.fft.rfftfreq(m, 1 / SR)), m)[..., :n]


def shade(points):
    return lambda f: voltage_ratio(along(points, f))


def along(points, hz):
    f, v = np.transpose(points)
    return np.interp(np.log(hz + 1), np.log(f + 1), v, left=v[0], right=v[-1])


def curves(rows, t):
    s, *cols = np.transpose(rows)
    return [np.interp(t, s, c) for c in cols]


def unit(x):
    return x / np.sqrt(np.mean(np.abs(x) ** 2) + 1e-20)


def add(track, s, x):
    part = track[round(s * SR):][:len(x)]
    part += x[:len(part)]


def scene():
    return (rubbing() + ticks() + panels() + squeaks() + tumble() + table() + quiet())[None]


def top_cut(x):
    return signal.sosfilt(signal.butter(12, 16460, fs=SR, output="sos"), x)


def record(dry):
    top_hz, leak_db, leak_db_per_khz = 15330, -26, 12
    edge = lambda hz: voltage_ratio((hz > top_hz) * (leak_db - leak_db_per_khz * (hz - top_hz) / 1000))
    mix = filtered(dry[0], edge)[None]
    return top_cut(mix)


dry = scene()
out = record(dry)
unload_wav(out)
```